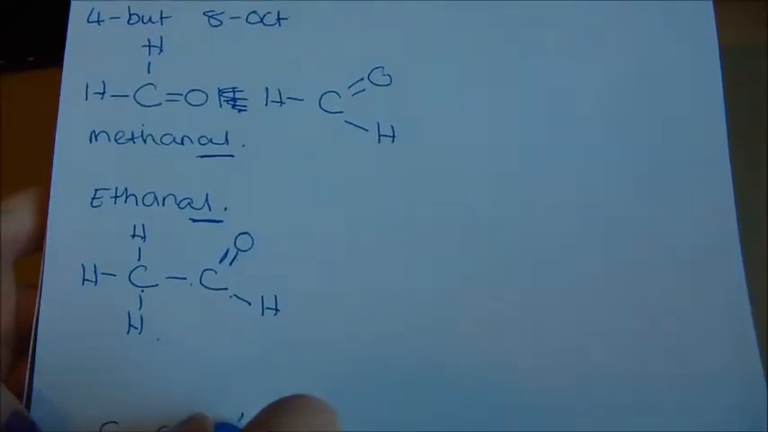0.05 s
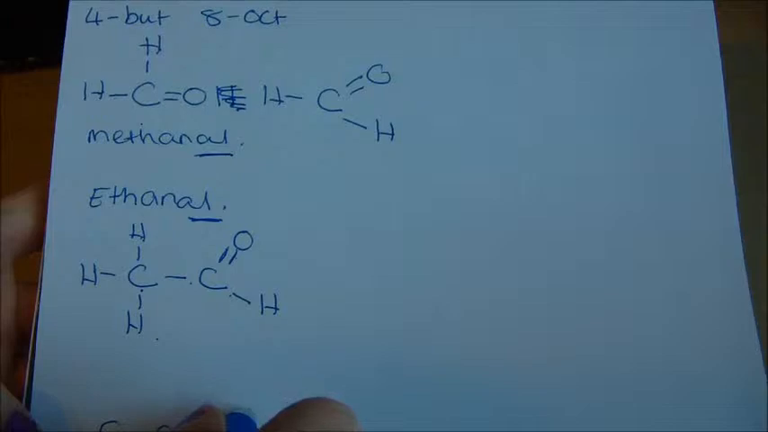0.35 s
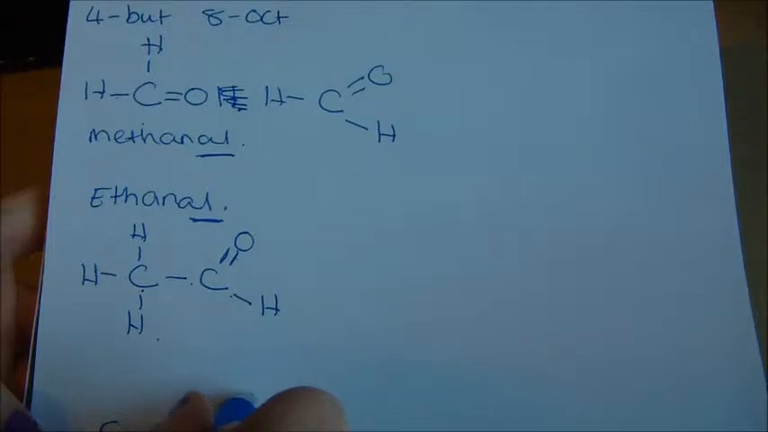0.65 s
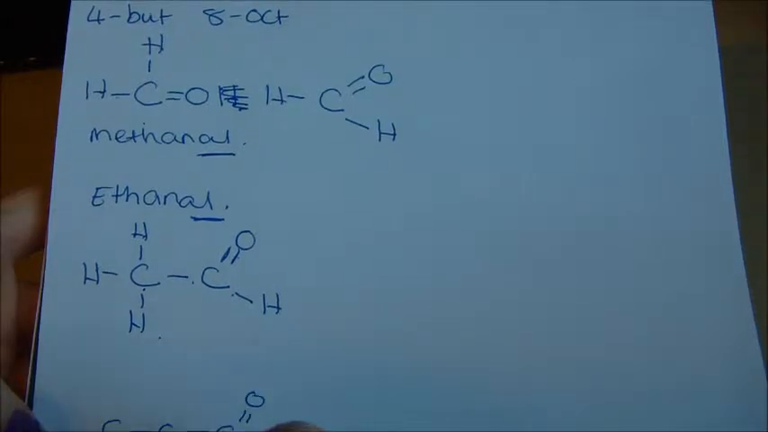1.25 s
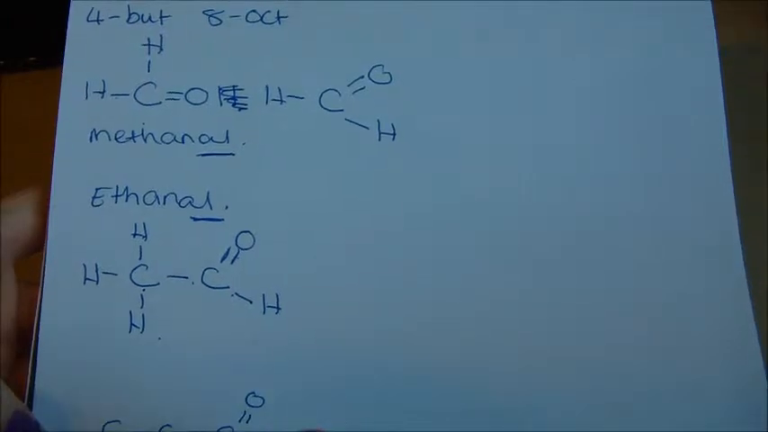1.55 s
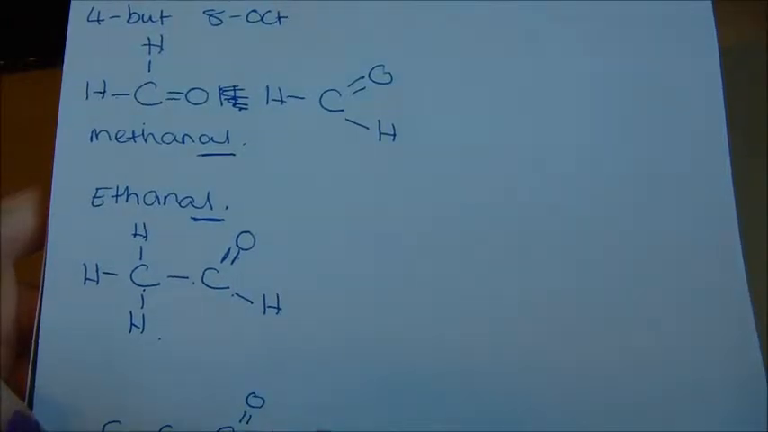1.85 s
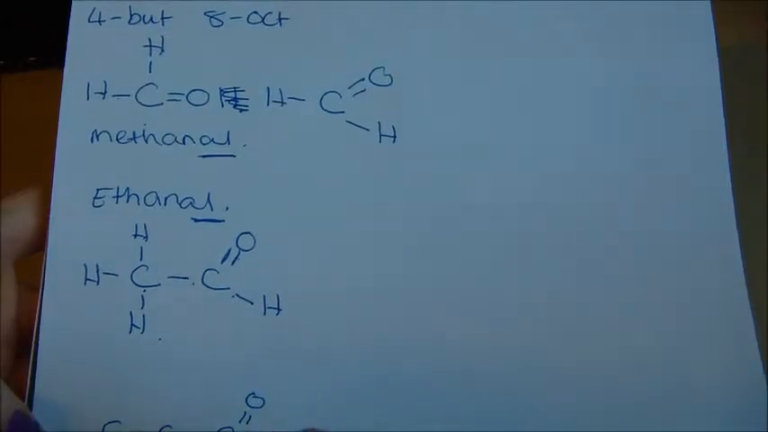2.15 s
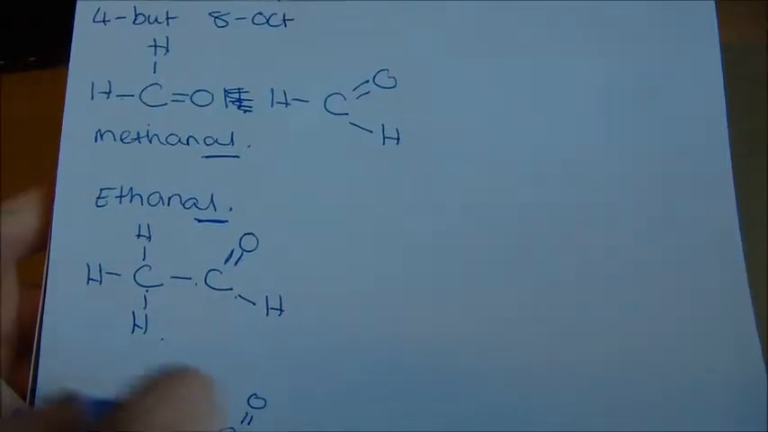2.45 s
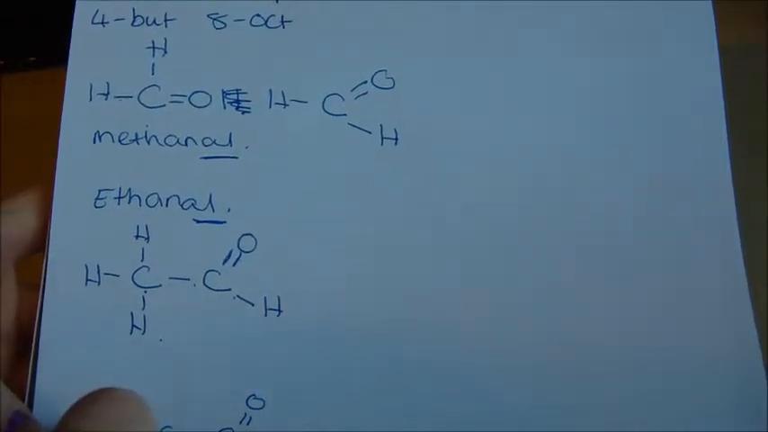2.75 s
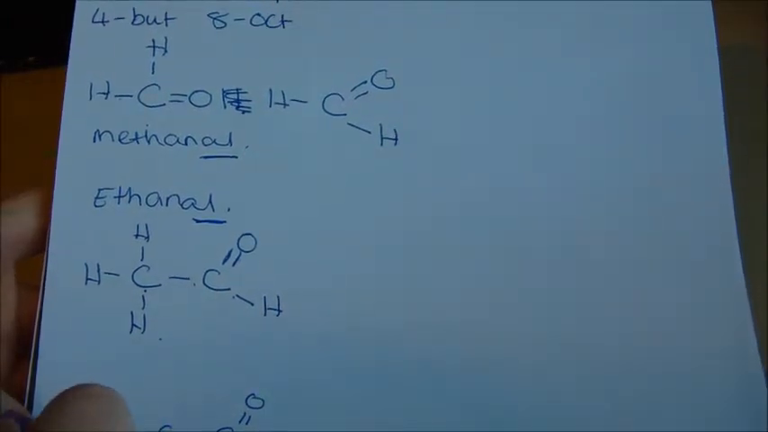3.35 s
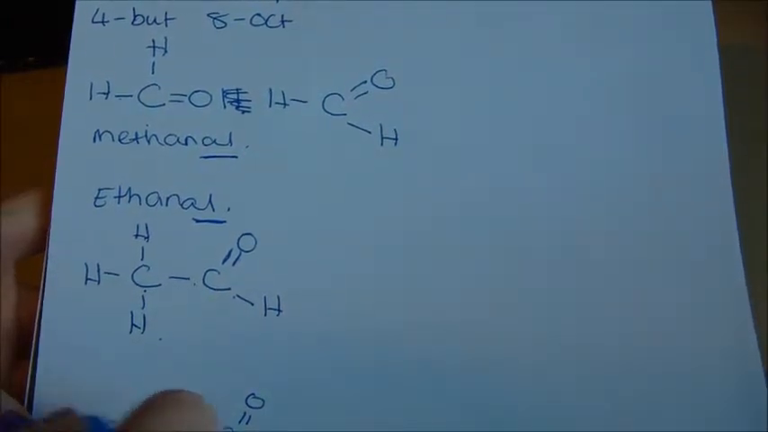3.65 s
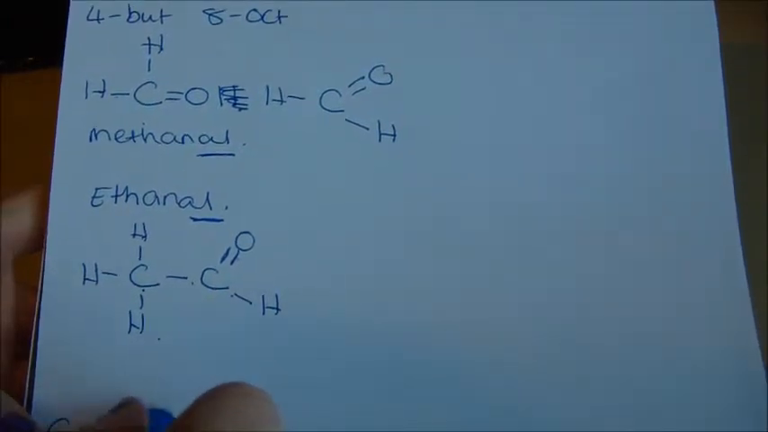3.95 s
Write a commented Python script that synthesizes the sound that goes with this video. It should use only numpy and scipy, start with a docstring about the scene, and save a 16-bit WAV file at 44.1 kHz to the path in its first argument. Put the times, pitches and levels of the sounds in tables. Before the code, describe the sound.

A ballpoint pen writes on paper close by, with irregular tip clicks, small desk knocks and faint scratchy strokes. The taps are hardest from about 1.5 to 2.1 seconds. A hand scuffs the sheet near 1.2 and 2.5 seconds, with a soft thud at 2.7. Lighter taps follow, then a last stroke and slide around 3.8 seconds. Fan hum, hiss and a faint high whine continue throughout.

```python
"""A ballpoint pen writes on a sheet of paper on a desk, close up in a small quiet room.
From the start a fan hums, electronics whine and the microphones hiss; the ball rolls faintly and the
hand slides, scuffs and judders on the sheet. Each touch-down knocks pen and desk and clicks the tip,
hardest from 1.5 to 2.1 s. Near 2.5 s the hand swishes over the paper, then a fingertip thuds and the
desk rocks. Lighter taps follow, and the writing ends on a last stroke and slide."""
import sys
import numpy as np
from scipy import signal
from scipy.fft import rfft, irfft, next_fast_len
from scipy.io import wavfile
from scipy.ndimage import map_coordinates

SR = 44100
rng = np.random.default_rng(int(sys.argv[2]) if len(sys.argv) > 2 else 0)


def bounce(signal):
    """Save signal as a 16-bit WAV file at the path given by the first command-line argument."""
    frames = np.transpose(np.atleast_2d(signal))
    limited = np.clip(frames, -1, 1)
    pcm = np.round(limited * 32767).astype(np.int16)
    wavfile.write(sys.argv[1], SR, pcm)


N = 176400
TIME = np.arange(N) / SR
NOISE_TOP_HZ, BAND_LIMIT_HZ = 15300, 16600


def amp(db):
    """Decibels to gain."""
    return 10 ** (np.asarray(db) / 20)


def unit(x):
    """Scale to rms 1."""
    return x / np.sqrt(np.mean(x ** 2) + 1e-20)


def along(points, hz):
    """Read a curve of (frequency, value) points on a log frequency axis."""
    freqs, values = np.transpose(points)
    return np.interp(np.log(hz + 1), np.log(freqs + 1), values)


def pan(db):
    """Left and right gains for a level difference; positive leans left."""
    return amp(np.array([[.5], [-.5]]) * db)


def wobble(rate):
    """A smooth random modulator, rate knots a second."""
    knots = rng.standard_normal(int(N * rate / SR) + 4)
    return map_coordinates(knots, [TIME * rate])


def filtered(x, response):
    """EQ x with a gain that is a function of frequency."""
    size = x.shape[-1]
    padded = next_fast_len(size + SR // 4)
    return irfft(rfft(x, padded) * response(np.fft.rfftfreq(padded, 1 / SR)), padded)[..., :size]


def noise(spectrum, correlation, size=N):
    """Coloured stereo noise of rms 1; less left-right correlation makes it wider."""
    def mid_side_eq(hz):
        width = np.arccos(np.clip(along(correlation, hz), -1, 1)) / 2
        return amp(along(spectrum, hz)) * (hz < NOISE_TOP_HZ) * [np.cos(width), np.sin(width)]
    mid, side = filtered(rng.standard_normal((2, size)), mid_side_eq)
    return unit(np.array([mid + side, mid - side]))


def impulse(spectrum, size=1024):
    """A minimum-phase click of peak 1 with this spectrum."""
    cepstrum = irfft(np.log(amp(along(spectrum, np.fft.rfftfreq(size, 1 / SR)))))
    cepstrum[1:size // 2] *= 2
    cepstrum[size // 2 + 1:] = 0
    click = irfft(np.exp(rfft(cepstrum)))
    return click / np.abs(click).max()


def add(out, s, x):
    """Mix x into out at time s."""
    start = max(round(s * SR), 0)
    out[:, start:start + x.shape[-1]] += x[..., :N - start]


def swell(s, length, fade_s):
    """A fade-in, hold and fade-out, the fades centred on the start and end."""
    return np.clip(np.minimum(TIME - s, s + length - TIME) / fade_s + .5, 0, 1)


def hit(t, db, t60, attack_s):
    """A percussive envelope: rounded attack, exponential decay."""
    return amp(db - 60 * t / t60) * (1 - np.exp(-t / attack_s))


# room tone EQ (frequency [Hz], level [dB])
AIR_EQ = [(15, -25), (30, -31), (42, -2), (58, -23), (85, -32.5), (110, -18), (140, -12), (185, -16.5),
          (215, -4), (240, -11.5), (300, -6), (420, -12), (650, -14), (900, -12.5), (1200, -12),
          (1500, -14), (2480, -12), (3100, -13.5), (6000, -16), (12300, -17.5), (15000, -15.5)]
# its stereo image, narrow lows and wide highs (frequency [Hz], correlation [0-1])
AIR_CORRELATION = [(30, 0.9), (250, .93), (600, 0.64), (1200, 0.25), (2500, 0.11), (5000, 0.16),
                   (14000, 0.034)]
# its balance (frequency [Hz], left minus right [dB])
AIR_BALANCE = [(30, -11), (250, -8.5), (1000, -4), (3000, -1.5), (8000, 0.5), (14000, -1)]


def room_tone():
    """A steady bed of room air and microphone hiss, its lows leaning right."""
    air = noise(AIR_EQ, AIR_CORRELATION)
    return amp(-46.5) * filtered(air, lambda hz: pan(along(AIR_BALANCE, hz)))


def tone(hz, phase=0):
    """A sine of rms 1 with a random starting phase."""
    return np.sqrt(2) * np.sin(2 * np.pi * (hz * TIME + rng.random()) + phase)


# fan tones (frequency [Hz], level [dB])
FAN_TONES = [(22.6, -58.5), (40, -65.5), (131, -72), (205, -64.5), (263.5, -52), (286, -64.5),
             (522.2, -71.5), (840.5, -66.5), (1249, -68), (1684, -71.5), (2524.5, -68.5)]
FAN_WAVER_DB, FAN_WAVER_RAD, LOW_PAN_DB = 1.22, 0.41, -5.5


def fan_hum():
    """The fan drones, each tone wavering in level and phase."""
    hum = sum(amp(db + FAN_WAVER_DB * wobble(12)) * tone(hz, FAN_WAVER_RAD * wobble(15))
              for hz, db in FAN_TONES)
    return pan(LOW_PAN_DB) * hum


# electronic tones (frequency [Hz], level [dB])
WHINE_TONES = [(11781, -69.5), (13787, -77), (14026, -77), (15045, -62.5), (15105, -63), (15165, -67.5),
               (15225, -69)]
# noise band around them (frequency [Hz], level [dB])
FUZZ_EQ = [(14000, -66), (14850, -12), (15100, 0), (15260, -22), (15350, -40)]


def electronic_whine():
    """Electronics sing in thin, steady tones with a halo of fuzz, off to the right."""
    tones = sum(amp(db) * tone(hz) for hz, db in WHINE_TONES)
    fuzz = amp(-77) * noise(FUZZ_EQ, correlation=[(15000, 0.88)])
    return pan(-14.5) * (tones + fuzz)


# stereo image of the paper noises (frequency [Hz], correlation [0-1])
PAPER_CORRELATION = [(300, 0.77), (1200, 0.88), (3000, 0.81), (8000, 0.45)]
# pen strokes, brighter when faster (time [s], length [s], level [dB], centre [Hz])
PEN_STROKES = [(0, 0.043, -50, 1650), (0.336, 0.15, -54.5, 1010), (.825, 0.059, -49.5, 1400),
               (0.902, 0.075, -47.5, 1200), (0.991, .13, -50, 1130), (1.487, .12, -50, 1300),
               (1.823, 0.1, -45.5, 1290), (2.101, 0.11, -48, 1390), (2.31, 0.057, -51.5, 1210),
               (3.169, 0.047, -49.5, 1120), (3.539, 0.07, -49.5, 740), (3.615, 0.053, -45, 885),
               (3.678, 0.027, -45.5, 1100), (3.823, .19, -47.5, 1030)]
# rolling ball EQ (frequency [multiple of the centre], level [dB])
BALL_EQ = [(.15, -7), (.4, -1), (.7, 3), (1, 3.5), (1.5, -1.5), (2.3, -5), (4.5, -14.5), (12, -19)]
STROKE_FADE_S, BALL_GRAIN_DB, RUB_PAN_DB = .025, 1, -4.5


def ball_roll():
    """The ball catches unevenly on the paper's fibres: a grainy band of noise for each stroke."""
    out = np.zeros((2, N))
    for s, length, db, centre_hz in PEN_STROKES:
        size = round((length + 2 * STROKE_FADE_S) * SR)
        t = np.arange(size) / SR
        envelope = amp(db) * np.clip(np.minimum(t, t[::-1]) / STROKE_FADE_S - .5, 0, 1)
        eq = [(ratio * centre_hz, level) for ratio, level in BALL_EQ]
        roll = noise(eq, PAPER_CORRELATION, size=SR // 2)
        add(out, s - STROKE_FADE_S, envelope * roll[:, :size])
    grain = unit(amp(BALL_GRAIN_DB * wobble(120)))
    return pan(RUB_PAN_DB) * grain * out


# fader ride of the sliding hand (time [s], level [dB])
SLIDE_RIDE = [(0, -40), (.06, -47), (.15, -46), (.21, -65), (1.17, -54.5), (1.23, -46), (1.28, -45.5),
              (1.34, -73), (2.46, -54.5), (2.53, -43), (2.58, -39), (2.63, -55.5), (3.45, -62), (3.58, -53),
              (3.65, -64), (3.74, -51.5), (3.85, -49), (3.99, -45.5)]
# skin on paper EQ (frequency [Hz], level [dB])
SKIN_EQ = [(100, -35), (250, -18), (400, 3.5), (520, 0), (700, -4), (900, -1.5), (1200, -6.5), (1700, -3),
           (2600, -11), (5000, -25.5), (15000, -28)]
SKIN_GRAIN_DB = 2.5


def hand_slide():
    """Skin drags over the fibres: a rough rub that swells and sinks."""
    envelope = amp(np.interp(TIME, *np.transpose(SLIDE_RIDE)))
    grain = amp(SKIN_GRAIN_DB * wobble(90))
    return pan(RUB_PAN_DB) * envelope * unit(grain * noise(SKIN_EQ, PAPER_CORRELATION))


# soft scuffs of the hand (time [s], level [dB], t60 [s], attack [s])
SCUFF_CUES = [(0.03, -37.5, 0.054, 0.00081), (1.004, -38.5, 0.046, .002), (1.185, -36, 0.1, .001),
              (1.21, -30.5, 0.069, 0.0032), (1.224, -34, 0.064, .002), (1.546, -37, 0.053, .001),
              (1.977, -35, 0.035, 0.00084), (2.437, -31, 0.021, 0.00091), (2.483, -30.5, 0.065, .005),
              (2.509, -32.5, 0.11, .005), (2.551, -32, 0.087, 0.0046), (2.953, -35, 0.086, 0.00079),
              (3.368, -43, .08, .005), (3.486, -42, .04, .001)]
# scuff EQ (frequency [Hz], level [dB])
SCUFF_EQ = [(100, -19), (300, -1), (550, 1), (1000, -5), (1600, -1.5), (2400, -5.5), (3500, -5.5),
            (5500, -14.5), (9000, -18.5), (16000, -32)]
BUMP_PAN_DB = -2


def hand_scuffs():
    """The hand bumps the sheet against the desk in short, dull puffs."""
    envelope, t = np.zeros((1, N)), np.arange(SR // 4) / SR
    for s, db, t60, attack_s in SCUFF_CUES:
        add(envelope, s, hit(t, db, t60, attack_s))
    return pan(BUMP_PAN_DB) * envelope * noise(SCUFF_EQ, PAPER_CORRELATION)


# modes of pen and desk (frequency [Hz], level [dB], t60 [s])
DESK_MODES = [(662, -3, 0.029), (752, -5, 0.035), (970, -10, .015), (1232, -14, 0.12), (1388, -6, 0.025),
              (1567, -7, 0.047), (1783, -12, 0.037), (2068, -12, 0.042), (2477, -13.5, 0.035),
              (3417, -14.5, .055)]
KNOCK_ATTACK_S, MODE_SCATTER_DB, MODE_DETUNE = 0.00074, 2, 0.021


def desk_knock(t):
    """Pen and desk ring briefly, each mode's level and pitch varying from hit to hit."""
    hz, db, t60 = np.transpose(DESK_MODES)[:, :, None]
    strength, detune = rng.standard_normal((2, len(hz), 1))
    envelopes = hit(t, db + MODE_SCATTER_DB * strength, t60, KNOCK_ATTACK_S)
    cycles = hz * (1 + MODE_DETUNE * detune) * t + rng.random(hz.shape)
    return (envelopes * np.sin(2 * np.pi * cycles)).sum(0) / 2


# reverb decay (frequency [Hz], t60 [s])
ROOM_DECAY = [(300, 0.17), (1500, 0.048), (5000, 0.22), (14000, 0.055)]


def reverb(x):
    """The small room answers with a short stereo tail, each band dying at its own rate."""
    hz, t, bands = signal.stft(rng.standard_normal((2, SR // 5)), SR, nperseg=128)
    decay = amp(-60 * t / along(ROOM_DECAY, hz)[:, None])
    tail = signal.istft(bands * decay, SR, nperseg=128)[1]
    return signal.fftconvolve(x[None], tail / np.linalg.norm(tail[0]), axes=1)


# pen touch-downs (time [s], click level [dB], knock level [dB])
TAP_CUES = [(.0357, -26, -34), (.214, -27.5, -34), (.3194, -24, -25.5), (.4671, -28, -39),
            (.7552, -32, -36), (.9286, -35, -41), (1.1061, -24.5, -34), (1.4677, -19, -22.5),
            (1.5856, -29, -43), (1.6527, -23.5, -31.5), (1.7696, -17, -22), (1.9534, -22, -33),
            (2.0556, -16.5, -23.5), (2.2117, -30, -39), (2.3315, -29, -33.5), (2.4159, -20, -33),
            (2.9488, -25.5, -31), (3.078, -21, -33), (3.1759, -31, -44), (3.1872, -30, -40),
            (3.4551, -35, -37), (3.7343, -25, -40)]
# the sheet slapping the desk (frequency [Hz], level [dB])
SLAP_EQ = [(200, -12.5), (700, -9), (1900, -1), (3500, -9.5), (15000, -16)]
# the direct tip click (frequency [Hz], level [dB])
CLICK_EQ = [(500, -12.5), (2000, -2.5), (3500, -5.5), (5300, 6.5), (7300, 1.5), (9500, 0), (13000, -15),
            (16000, -17)]
# the click as the room receives it (frequency [Hz], level [dB])
OFF_AXIS_EQ = [(500, -16), (2000, -13), (3500, -3), (5300, -4.5), (7500, 0.5), (10000, -2.5), (13000, -3),
               (16000, -32)]
# early reflections off desk, camera and wall (delay [s], level [dB])
REFLECTIONS = [(.0007, -9), (.0052, -10), (.0076, -10), (0.0173, -15)]
KNOCK_LEAD_S, KNOCK_ECHO_S, KNOCK_ECHO_DB = 0.0031, 0.0086, -4
KNOCK_PAN_DB, KNOCK_SEND_DB, CLICK_PAN_DB, CLICK_SEND_DB = -4, -9, 8, 1
SLAP_DB, SLAP_T60_S = -13, 0.096  # level relative to the knock
SEAT_S, SEAT_DB = .0003, -15.5  # the refill seats in the barrel just after the click


def pen_taps():
    """The pen lands: the desk knocks and the sheet slaps, then the tip clicks home."""
    out, t = np.zeros((2, N)), np.arange(SR // 8) / SR
    click, off_axis = impulse(CLICK_EQ), impulse(OFF_AXIS_EQ)
    jitter = lambda delay: delay * rng.uniform(.92, 1.08)
    knock_pan = pan(KNOCK_PAN_DB)
    for s, click_db, knock_db in TAP_CUES:
        landing = s - KNOCK_LEAD_S
        knock = amp(knock_db) * desk_knock(t)
        slap_envelope = hit(t, knock_db + SLAP_DB, SLAP_T60_S, KNOCK_ATTACK_S)
        slap = slap_envelope * noise(SLAP_EQ, PAPER_CORRELATION, size=len(t))
        add(out, landing, knock_pan * (knock + slap))
        add(out, landing + jitter(KNOCK_ECHO_S), knock_pan * amp(KNOCK_ECHO_DB) * knock)
        add(out, s, knock_pan * amp(KNOCK_SEND_DB) * reverb(knock))
        add(out, s, pan(CLICK_PAN_DB) * amp(click_db) * click)
        add(out, s + jitter(SEAT_S), amp(click_db + SEAT_DB) * off_axis)
        add(out, s, amp(click_db + CLICK_SEND_DB) * reverb(off_axis))
        for delay, db in REFLECTIONS:
            add(out, s + jitter(delay), pan(rng.normal(0, 4)) * amp(click_db + db) * off_axis)
    return out


# skin judders (time [s], length [s], start pitch [Hz], end pitch [Hz], level [dB])
JUDDER_CUES = [(0.051, 0.032, 529, 500, -43.5), (0.08, 0.091, 490, 420, -52),
               (2.549, 0.04, 530, 537, -40.5), (3.888, .11, 412, 474.6, -52)]
JUDDER_WAVER_RAD, JUDDER_GRAIN_DB = 0.3, 2


def skin_judder():
    """Skin sticks and slips on the paper at an unsteady, gliding rate: a hollow note."""
    out = np.zeros(N)
    for s, length, start_hz, end_hz, db in JUDDER_CUES:
        glide_hz = np.interp(TIME, [s, s + length], [start_hz, end_hz])
        phase = 2 * np.pi * np.cumsum(glide_hz) / SR + JUDDER_WAVER_RAD * wobble(130)
        grain = amp(JUDDER_GRAIN_DB * wobble(110))
        out += amp(db) * swell(s, length, fade_s=0.011) * unit(grain * np.sin(phase))
    return pan(RUB_PAN_DB) * out


# weight shifts on the desk (time [s], level [dB])
ROCK_CUES = [(.33, -38), (1.47, -40), (1.775, -33), (2.708, -28)]
ROCK_HZ = 34


def desk_rock():
    """The desk sways under the hand with a soft sub-bass bump."""
    out, t = np.zeros((2, N)), np.arange(SR // 2) / SR
    sway = np.sin(2 * np.pi * ROCK_HZ * t)
    for s, db in ROCK_CUES:
        add(out, s, hit(t, db, t60=0.12, attack_s=0.028) * sway)
    return pan(LOW_PAN_DB) * out


# fingertip landings (time [s], level [dB])
THUD_CUES = [(0.437, -40), (0.478, -39.5), (1.186, -28.5), (1.227, -51), (2.699, -31.5), (2.988, -37),
             (3.371, -35), (3.489, -37.5), (3.582, -42)]
# thud EQ (frequency [Hz], level [dB])
THUD_EQ = [(200, -21), (500, -11), (750, 4), (1000, 3.5), (1300, -3), (1650, -5.5), (2200, -12),
           (5000, -18), (15000, -42)]


def fingertip_thuds():
    """Fingertips pat the sheet against the desk: short, boxy bursts of noise."""
    envelope, t = np.zeros((1, N)), np.arange(SR // 4) / SR
    for s, db in THUD_CUES:
        add(envelope, s, hit(t, db, t60=.05, attack_s=0.002))
    return pan(BUMP_PAN_DB) * envelope * noise(THUD_EQ, PAPER_CORRELATION)


# paper swishes (time [s], length [s], level [dB])
SWISH_CUES = [(2.5, 0.018, -54), (3.79, 0.13, -49)]
# swish EQ (frequency [Hz], level [dB])
SWISH_EQ = [(1000, -22), (3000, 4), (7000, 0), (15000, -4)]


def paper_swish():
    """The paper gives a dry, airy swish under the moving hand."""
    envelope = sum(amp(db) * swell(s, length, fade_s=0.046) for s, length, db in SWISH_CUES)
    return envelope * noise(SWISH_EQ, PAPER_CORRELATION)


def scene():
    """Pen, hand and desk over the room's bed."""
    bed = room_tone() + fan_hum() + electronic_whine()
    friction = ball_roll() + hand_slide() + skin_judder() + paper_swish()
    impacts = hand_scuffs() + pen_taps() + desk_rock() + fingertip_thuds()
    return bed + friction + impacts


def record(dry):
    """A brick-wall low-pass at the camera's band limit."""
    return filtered(dry, lambda hz: hz < BAND_LIMIT_HZ)


dry = scene()
out = record(dry)
bounce(out)
```